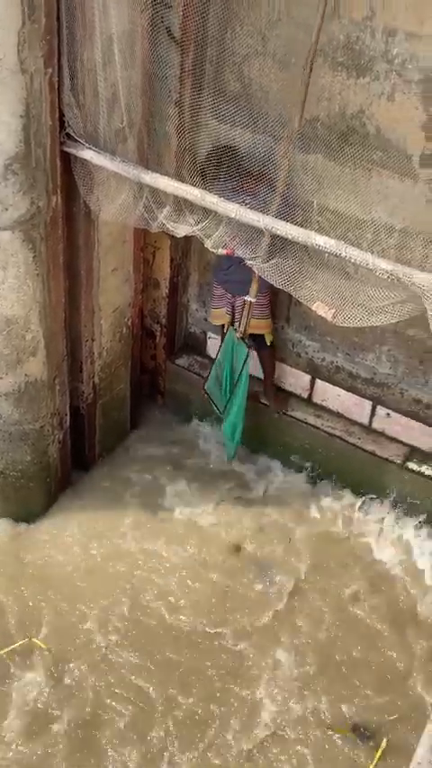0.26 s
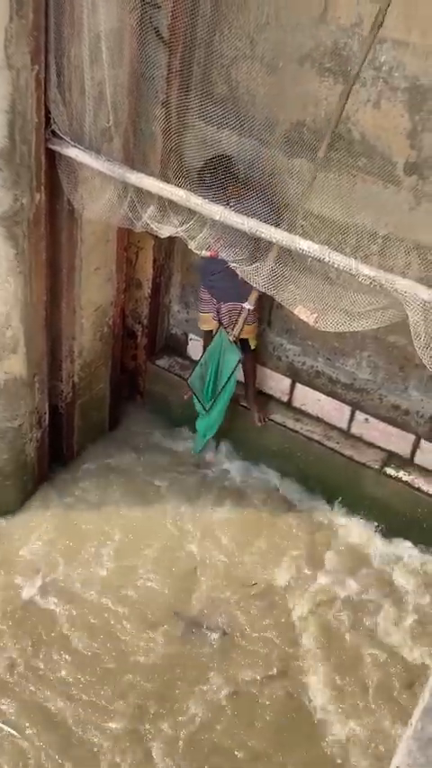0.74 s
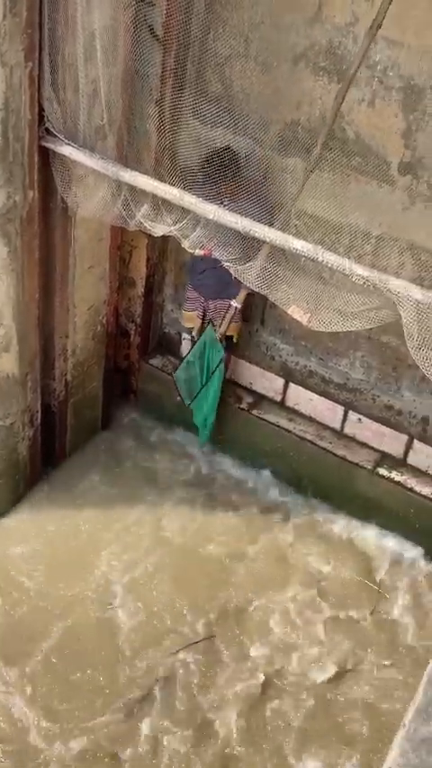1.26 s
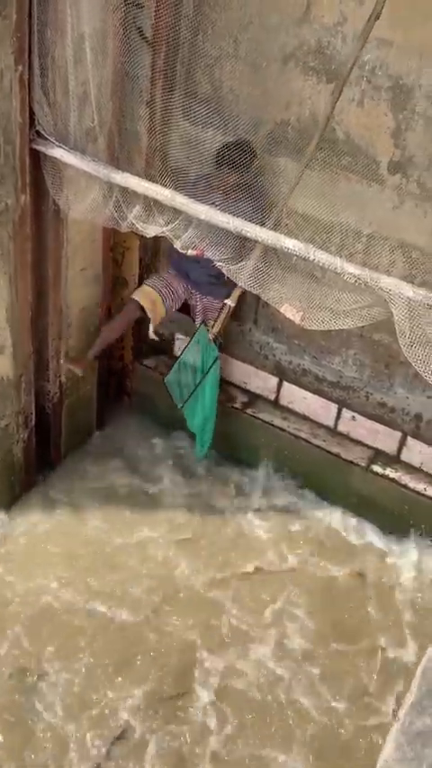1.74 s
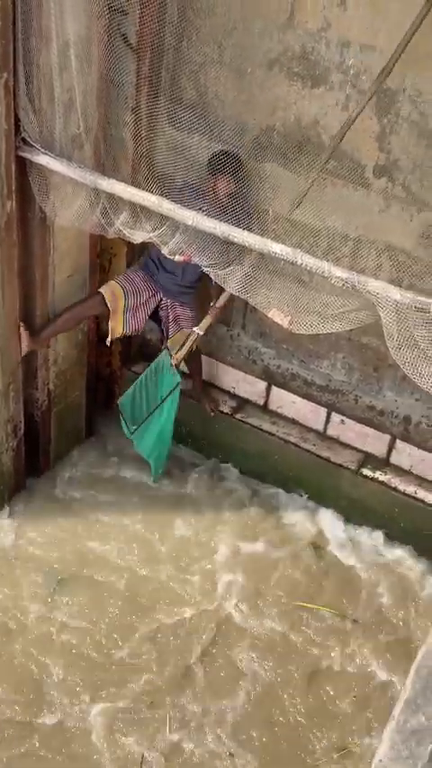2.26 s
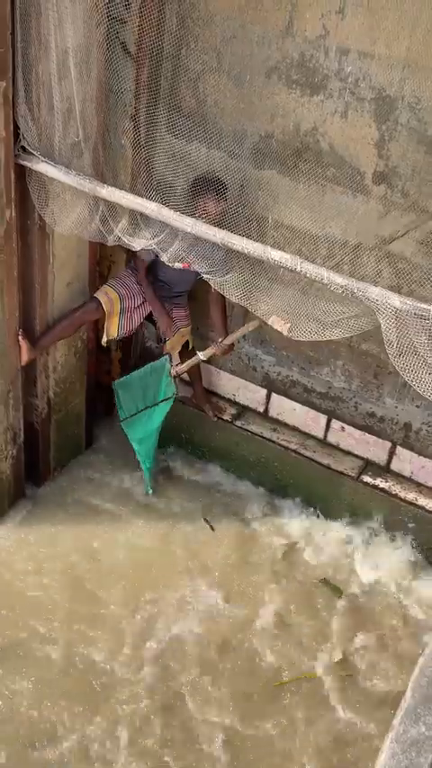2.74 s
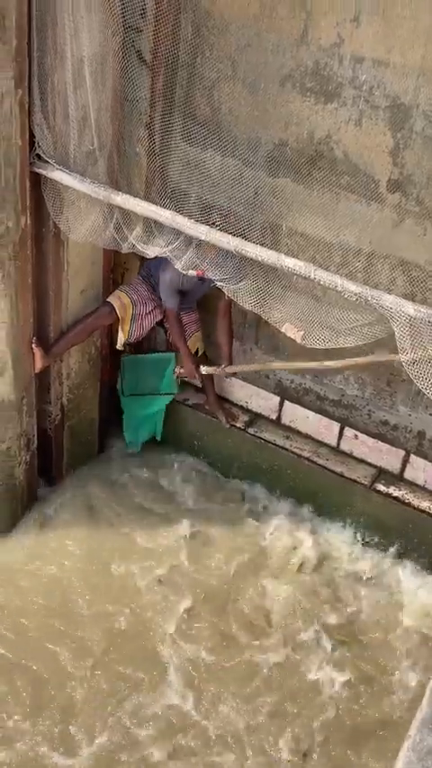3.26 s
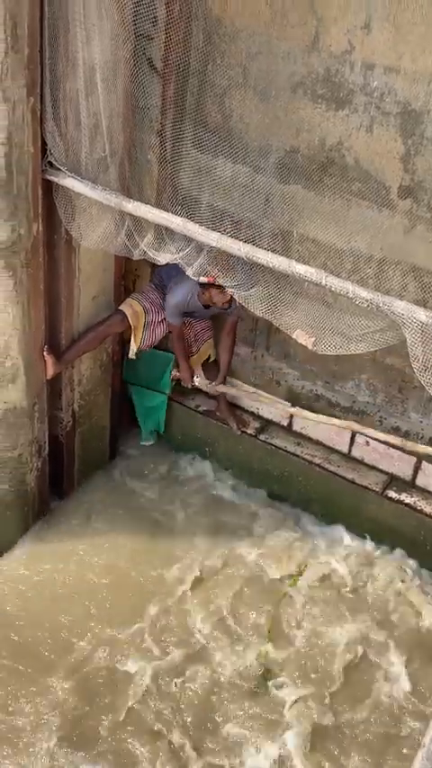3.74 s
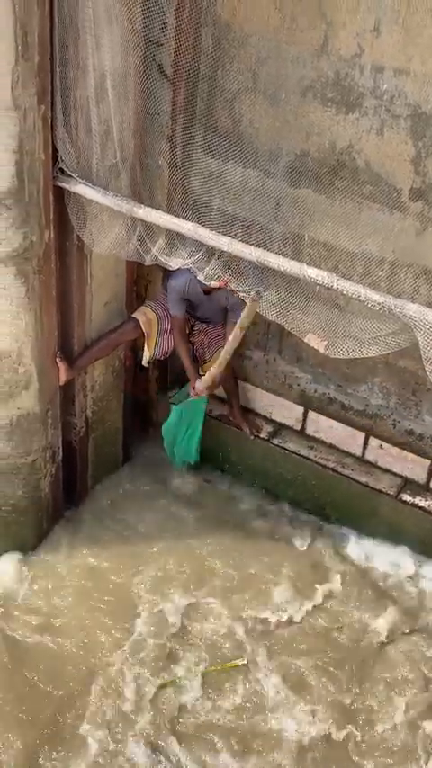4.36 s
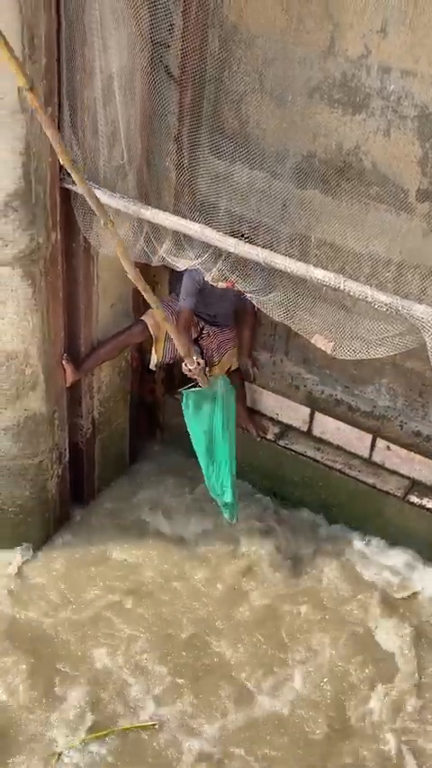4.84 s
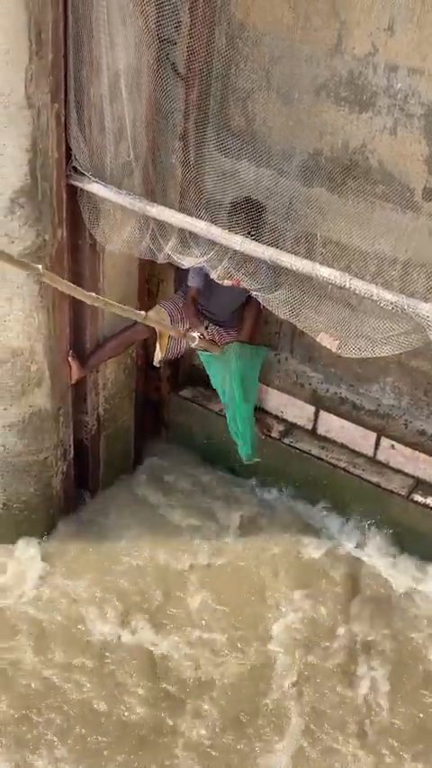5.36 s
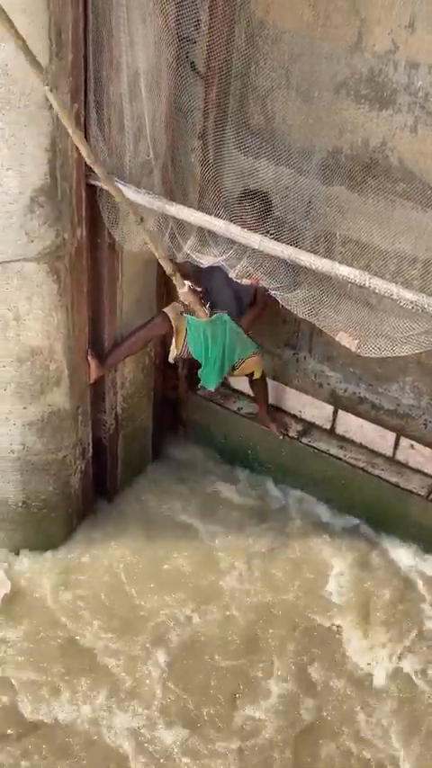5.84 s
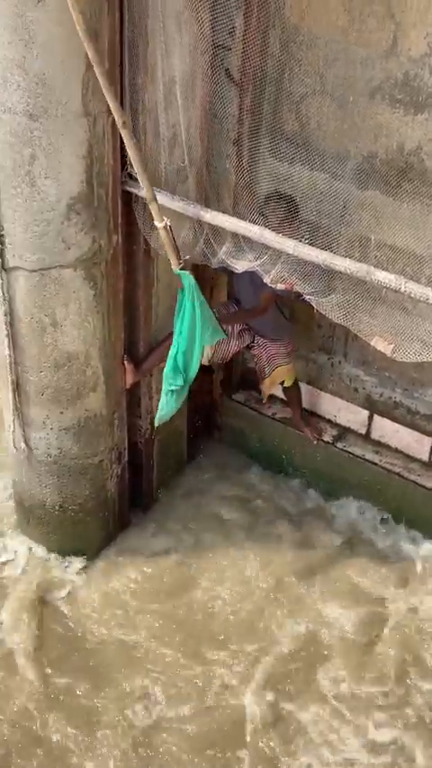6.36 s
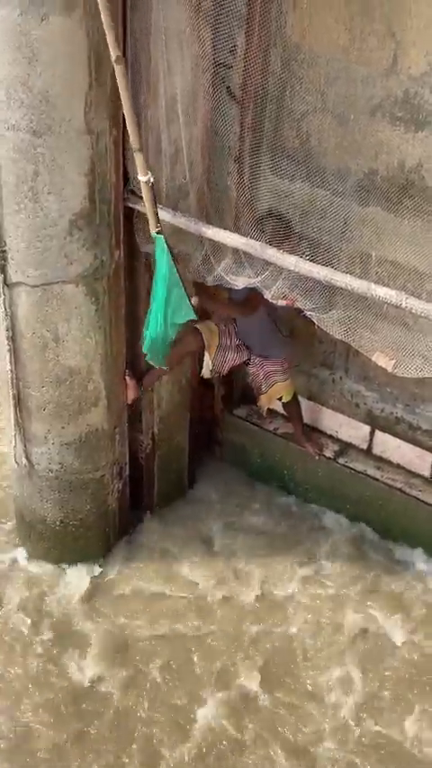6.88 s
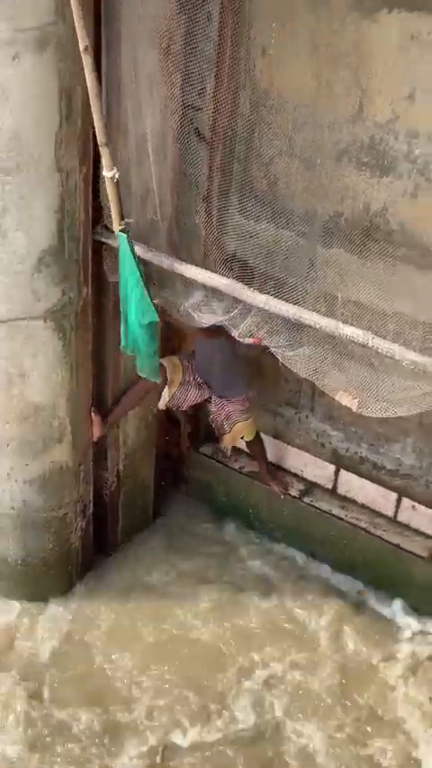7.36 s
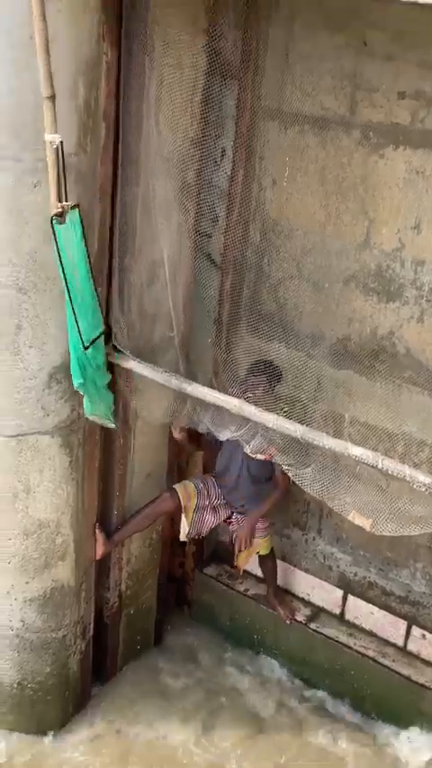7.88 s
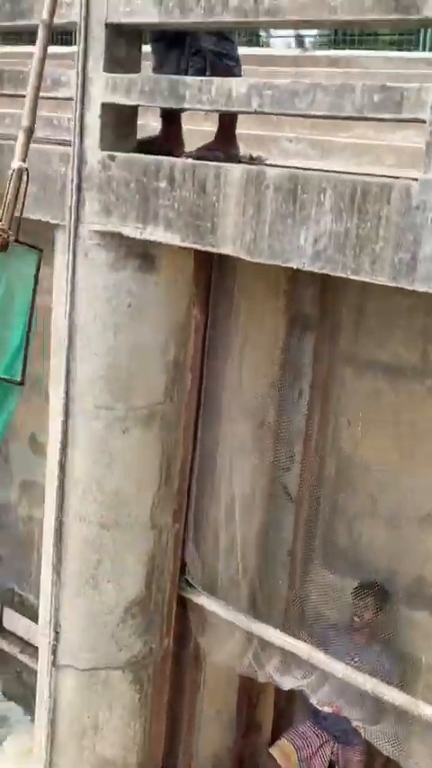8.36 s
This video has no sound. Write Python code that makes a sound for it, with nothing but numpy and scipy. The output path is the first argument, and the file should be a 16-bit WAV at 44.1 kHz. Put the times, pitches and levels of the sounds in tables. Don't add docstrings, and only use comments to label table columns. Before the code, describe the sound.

Muddy water roars steadily through a concrete sluice gate, swelling in low surges, with fizzing spray, deep gulps and small gurgles.

```python
import sys
import numpy as np
from scipy import signal
from scipy.fft import rfft, irfft, next_fast_len
from scipy.io import wavfile
from scipy.ndimage import uniform_filter1d

SR = 44100
rng = np.random.default_rng(int(sys.argv[2]) if len(sys.argv) > 2 else 0)


def transcribe(signal):
    frames = np.atleast_2d(signal).T
    limited = np.clip(frames, -1, 1)
    pcm = np.round(limited * 32767).astype(np.int16)
    wavfile.write(sys.argv[1], SR, pcm)


def ratio(d):
    e = np.asarray(d, float) / 20
    return 10 ** e


N = 379906


def evened(x):
    return x / np.sqrt(np.mean(x ** 2) + 1e-20)


def read(points, hz):
    point_hz, value = np.transpose(points)
    return np.interp(np.log(hz + 1), np.log(point_hz + 1), value)


def add(mix, start_s, sound):
    part = mix[max(round(start_s * SR), 0):][:len(sound)]
    part += sound[:len(part)]


def blobs(luck, bins, frames):
    across_pitch = uniform_filter1d(luck, size=bins, axis=0)
    return evened(uniform_filter1d(across_pitch, size=frames, axis=1))


def puffs(events, width=0.15):
    out = np.zeros(N)
    t = np.arange(8192) / SR
    for start_s, peak_db, centre_hz, length_s in events:
        edges_hz = [centre_hz / (1 + width), centre_hz * (1 + width)]
        band = signal.butter(2, edges_hz, "bandpass", fs=SR)
        noise = evened(signal.lfilter(*band, rng.standard_normal(len(t))))
        shape = np.exp(-2 * ((t - 2 * length_s) / length_s) ** 2)
        add(out, start_s - 2 * length_s, ratio(peak_db) * 0.5 * noise * shape)
    return out


def twig_ticks():
    # start_s [s, moment of the peak], peak_db [dB], centre_hz [Hz], length_s [s]
    touches = [
        (8.167, -24, 7400, 0.0027),
        (8.18, -32, 7500, 0.0017),
    ]
    return puffs(touches)


def splashes():
    # start_s [s, moment of the peak], peak_db [dB], centre_hz [Hz], length_s [s]
    drops = [
        (4.07, -20, 3370, 0.031),
        (4.07, -18, 1910, 0.023),
        (4.225, -22, 2970, 0.0088),
        (4.49, -22, 4480, 0.025),
        (4.66, -20, 3000, .012),
        (6.42, -18, 1900, 0.013),
    ]
    return puffs(drops)


def ring(hz, cycles, rise):
    turns = np.arange(0, 3 * cycles, hz / SR)
    age = turns / cycles
    swell_and_fade = 3 * age * np.exp(1 - 3 * age)
    return np.sin(2 * np.pi * turns * (1 + rise * age)) * swell_and_fade


def pocket_rings(pockets, ring_s, rise):
    out = np.zeros(N)
    for peak_s, peak_db, pitch_hz in pockets:
        add(out, peak_s - ring_s / 3, ratio(peak_db) * ring(pitch_hz, ring_s * pitch_hz, rise))
    return out


def gurgles():
    # peak_s [s], peak_db [dB], pitch_hz [Hz]
    small_pockets = [(0.517, -21, 710), (.72, -22.5, 313), (1.14, -20, 339), (1.794, -21, 639),
                     (1.8, -18, 310), (1.805, -19, 397), (3.04, -23, 556), (3.3, -22, 346),
                     (4.296, -26, 522), (4.464, -22, 888), (4.615, -23, 683), (5.01, -24, 1148),
                     (5.364, -24, 552), (5.84, -22, 884), (6.17, -17.5, 346), (6.44, -19, 383),
                     (7.152, -23, 570), (7.815, -23.5, 955), (7.92, -28, 384), (8.017, -21.5, 574),
                     (8.2, -26, 690)]
    return pocket_rings(small_pockets, ring_s=0.065, rise=0.0324)


def gulps():
    # peak_s [s], peak_db [dB], pitch_hz [Hz]
    large_pockets = [(0.163, -18, 64), (.57, -20, 104), (3.18, -23, 62), (3.31, -19.5, 93),
                     (8.0, -21, 70.6), (.79, -23, 110.4), (.975, -28, 183), (1.086, -27, 78.4),
                     (1.341, -23, 96), (1.805, -19.5, 103), (1.818, -20.5, 206), (2.78, -19.5, 225),
                     (2.92, -20.5, 227), (3.16, -15, 188.6), (3.25, -21, 227.6), (3.756, -23.2, 79.5),
                     (3.831, -23, 191), (3.913, -23, 253.6), (4.302, -26.5, 157), (4.529, -23, 165),
                     (5.098, -23, 283), (5.207, -26, 102), (5.66, -25, 110), (5.816, -15.5, 225),
                     (7.106, -22, 285), (7.181, -22, 105.3), (7.842, -22, 96), (8.034, -26, 279)]
    return pocket_rings(large_pockets, ring_s=0.09, rise=0.051)


def bubbles(per_s=5000, spread_db=2.5, cycles=7.04, rise=0.086, count=36):
    out = np.zeros(N)
    sizes_hz = np.geomspace(90, 15000, count)
    for hz in sizes_hz:
        luck, births = rng.random(N), np.zeros(N)
        chance = per_s * np.sqrt(hz) / np.sqrt(sizes_hz).sum() / SR
        born = luck < chance
        extra = np.minimum(-np.log(luck[born] / chance + 1e-9), 4)
        births[born] = ratio(spread_db * extra)
        out += np.sqrt(hz) * evened(signal.oaconvolve(births, ring(hz, cycles, rise))[:N])
    return evened(np.array([out, np.roll(out, N // 2)]))


def surges(hz, t):
    # crest_s [s], lift_db [dB], fall_s [s], centre_hz [Hz]
    waves = [(0.11, 9, 0.53, 134), (0.14, 4.5, 0.11, 812), (0.18, 3, 0.19, 56), (0.64, 2, 0.09, 176),
             (1.09, 5.5, 0.61, 119), (1.13, 2.4, 0.23, 1831), (1.79, 4.5, 0.3, 142), (2.64, 3.5, 0.2, 7958),
             (2.68, 11, 0.38, 152), (3.1, 1.5, 0.11, 2021), (3.19, 10, 0.45, 135), (3.83, 7, 0.16, 113),
             (3.92, 2, 0.22, 4375), (4.23, 7, 0.14, 56), (4.49, 4.5, 0.25, 211), (4.99, 3, 0.16, 456),
             (5.29, 7.5, 0.43, 103), (5.76, 6.5, 0.4, 165), (5.92, 3.5, 0.3, 5545), (6.18, 6, 0.36, 56),
             (6.38, 2, 0.12, 8192), (6.55, 7, 0.46, 194), (7.11, 6, 0.38, 159), (7.81, 2, 0.95, 56),
             (8.05, 6, 0.58, 169), (8.53, 2.3, 0.15, 218)]
    # time_s [s], level_db [dB]
    spray = [(0.0, -0.5), (0.66, 1), (1.32, -1.1), (1.98, -0.4), (2.65, -3.5), (3.31, 1.75), (3.97, 0.2),
             (4.63, 0.5), (5.29, 3), (5.95, -3), (6.62, 2.4), (7.28, 0.3), (7.94, 0.7), (8.6, -2.0)]
    # pitch_hz [Hz], share [0 = not at all, 1 = fully]
    spray_share = [(100, 0.39), (3000, 1.03)]
    rise_share, reach_octaves = 0.43, 2.44
    lift_db = read(spray_share, hz)[:, None] * np.interp(t, *np.transpose(spray))
    for crest_s, wave_db, fall_s, centre_hz in waves:
        after = (t - crest_s) / fall_s
        swell = np.exp(-np.where(after < 0, after / rise_share, after) ** 2)
        octaves = np.log2((hz + 1) / centre_hz)
        reach = np.exp(-(octaves / reach_octaves) ** 2)[:, None]
        lift_db = lift_db + wave_db * reach * swell
    return lift_db - lift_db.mean(axis=1, keepdims=True)


def swirl(frames, patchy_db=0.48, flicker_db=0.48, wide_db=0.69):
    luck = rng.standard_normal((3, 513, frames))
    patches = blobs(luck[0], bins=12, frames=12)
    broad = blobs(luck[1], bins=90, frames=6)
    flicker = evened(uniform_filter1d(luck[2, 0], size=6))
    return patchy_db * patches + wide_db * broad + flicker_db * flicker


def flow(level_db=-18.5, bubble_share=0.17):
    # pitch_hz [Hz], level_db [dB per Hz]
    flow_colour = [(20, -16), (40, -19.5), (60, 1.5), (102, -2.5), (225, -1), (450, -4.5), (720, -4),
                   (1300, -9.5), (2200, -14), (2900, -18), (5600, -21), (8000, -26.5), (11000, -32),
                   (16000, -36)]
    turbulence = rng.standard_normal((2, N))
    drive = np.sqrt(1 - bubble_share) * turbulence + np.sqrt(bubble_share) * bubbles()
    hz, t, z = signal.stft(drive, SR, nperseg=1024, noverlap=768)
    z = z * ratio(surges(hz, t) + swirl(len(t)))
    surging = signal.istft(z, SR, nperseg=1024, noverlap=768)[1][:, :N]
    size = next_fast_len(N)
    colour = ratio(read(flow_colour, np.fft.rfftfreq(size, 1 / SR)))
    return ratio(level_db) * evened(irfft(rfft(surging, size) * colour, size)[:, :N])


def ports(shared, other, wander_db=6.5, sway=0.44):
    # pitch_hz [Hz], lead [radians]
    lead_points = [(130, 0), (350, -.35), (900, -.35), (1250, -.08), (2100, 0), (2450, 1.0), (3000, .7),
                   (3600, .12), (4450, 1.0), (4660, 0),
                   (5450, 0), (5700, .8), (6300, 2.1), (6980, np.pi), (8200, np.pi), (8240, 2 * np.pi),
                 (9650, 2 * np.pi), (10100, 7.1), (11000, 6.45), (11900, 6.9), (12200, 2 * np.pi),
                 (13050, 2 * np.pi), (13800, 8.0), (15200, 3 * np.pi)]
    # pitch_hz [Hz], level_db [dB]
    apart_points = [(120, -84), (300, -21.5), (600, -11.5), (1050, -9.5), (1500, -35), (1950, -23),
                    (2600, -15), (3600, -7), (4500, -5), (4720, -14), (5450, -14), (5700, -13), (6850, -4),
                    (7150, -34), (8240, -34), (8300, -17), (9600, -17), (10200, -4), (11000, -8), (12000, -4),
                  (12300, -30), (13000, -30), (13300, -3), (14800, -2.5), (15800, -4.5)]
    # pitch_hz [Hz], level_db [dB]
    left_over_right = [(120, 0), (280, 2), (400, 1.3), (550, 2.4), (820, 2), (1000, .2), (1300, 0)]
    hz, t, (near, far) = signal.stft([shared, other], SR, nperseg=2048, noverlap=1536)
    luck = rng.standard_normal((2, len(hz), len(t)))
    wander, drift = (blobs(one, bins=24, frames=4) for one in luck)
    apart_db = read(apart_points, hz)[:, None]
    apart = np.minimum(ratio(apart_db + wander_db * wander), 0.9)
    lead = read(lead_points, hz)[:, None] + sway * ratio(apart_db) * drift
    turn = ratio(read(left_over_right, hz) / 2)[:, None] * np.exp(0.5j * lead)
    left = near * turn
    right = (np.sqrt(1 - apart ** 2) * near + apart * far) / turn
    return signal.istft(np.array([left, right]), SR, nperseg=2048, noverlap=1536)[1][:, :N]


def scene():
    shared, other = flow()
    water = shared + gulps() + gurgles() + splashes()
    return ports(water, other) + twig_ticks()


def top_cut(x):
    return signal.sosfilt(signal.butter(12, 15740, fs=SR, output="sos"), x)


def record(dry):
    return top_cut(dry)


dry = scene()
out = record(dry)
transcribe(out)
```